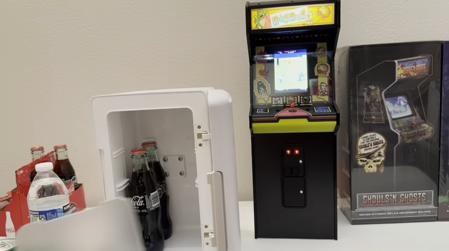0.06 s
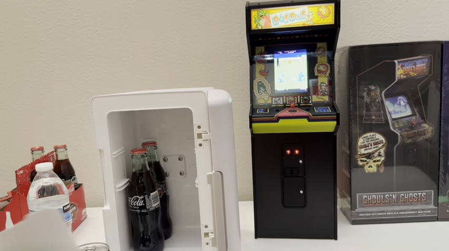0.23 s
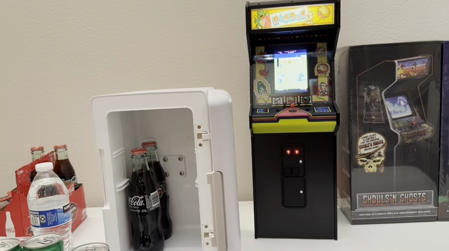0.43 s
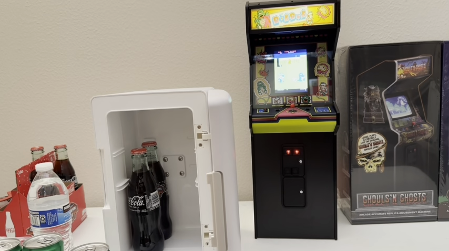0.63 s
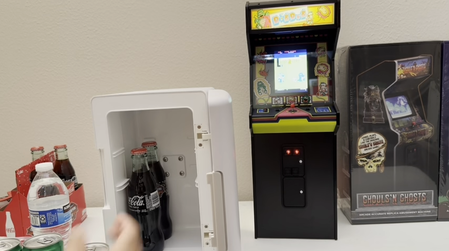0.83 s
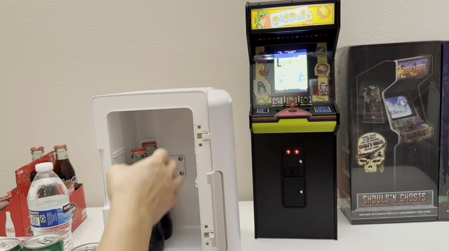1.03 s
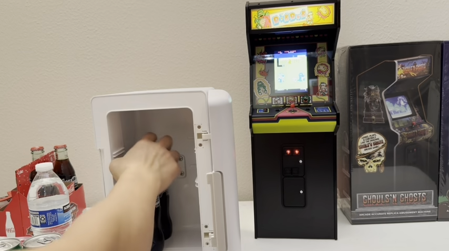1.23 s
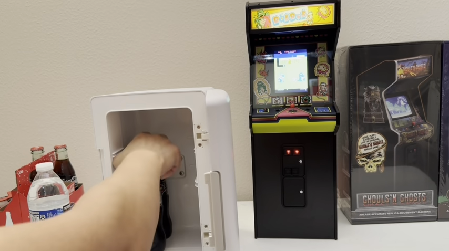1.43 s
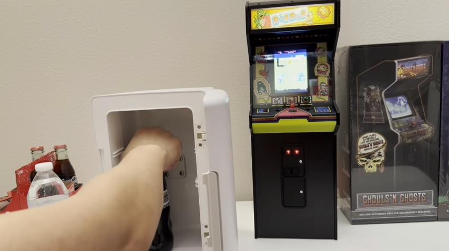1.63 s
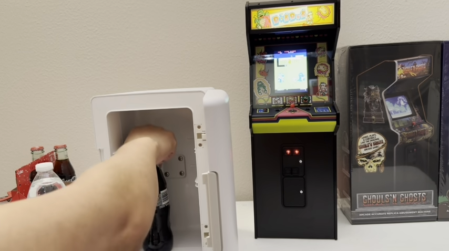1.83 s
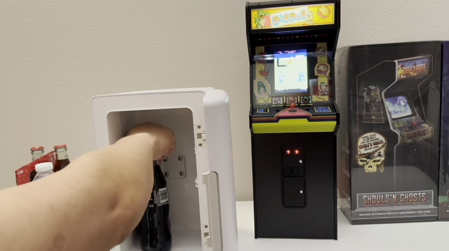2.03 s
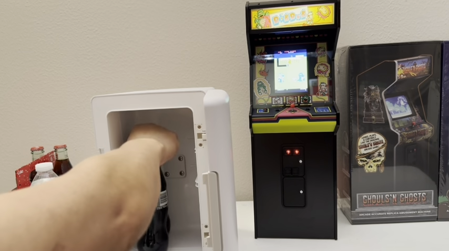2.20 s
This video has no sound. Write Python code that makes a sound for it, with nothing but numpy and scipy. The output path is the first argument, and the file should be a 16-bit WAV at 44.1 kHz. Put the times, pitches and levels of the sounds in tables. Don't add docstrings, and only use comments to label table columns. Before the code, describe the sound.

Small glass bottles knock together brightly inside a mini fridge, their bases thumping on hollow plastic

```python
import sys
import numpy as np
from scipy import signal
from scipy.io import wavfile

SR = 44100
rng = np.random.default_rng(int(sys.argv[2]) if len(sys.argv) > 2 else 0)


def log_audio(samples):
    frames = np.atleast_2d(samples).T
    limited = np.clip(frames, -1, 1)
    pcm = np.round(limited * 32767).astype(np.int16)
    wavfile.write(sys.argv[1], SR, pcm)


def invert_db(x):
    u = np.asarray(x, float) / 20
    return 10 ** u


N = 99798
T = np.arange(N) / SR


def rms_one(x):
    return x / np.sqrt(np.mean(x ** 2) + 1e-20)


def at_hz(points, hz, axis=1):
    points = np.array(points)
    return np.interp(np.log(hz), np.log(points[:, 0]), points[:, axis])


def pan(db):
    return invert_db(np.array([[db / 2], [-db / 2]]))


def band(x, order, hz, kind):
    return signal.sosfilt(signal.butter(order, hz, kind, fs=SR, output="sos"), x)


def drift(rate):
    r = np.exp(-2 * np.pi * rate * 40 / SR)
    slow = signal.lfilter([1], [1, -2 * r, r * r], rng.standard_normal(N // 40 + 2002))[2000:]
    return np.interp(np.arange(N) / 40, np.arange(len(slow)), rms_one(slow))


def fade(x, t60):
    return signal.lfilter([1], [1, -invert_db(-60 / (max(t60, .005) * SR))], x + 1e-18)


def clicks(s, gain):
    out = np.zeros(N, complex)
    out[(np.asarray(s) * SR).astype(int)] = gain
    return out


def strokes(rows):
    out = 0
    for s, hold, db, t60 in rows:
        release_db = 60 * np.maximum(T - s - hold, 0) / t60
        out = out + invert_db(db - release_db) * np.clip((T - s) / 0.008, 0, 1)
    return out


def banded_noise(spectrum, patchy_db, rate):
    # (frequency [Hz], likeness [-1..1], left-right [dB])
    ears = [(50, .995, .5), (250, .97, 2.8), (1000, .65, 4.5), (4000, .4, 4), (12000, .6, 1.5)]
    out, together, corners = 0, drift(rate / 2), 22 * 2 ** np.arange(0, 9.9, .5)
    white = rng.standard_normal((2, 2, N))
    for k, (low, high) in enumerate(zip(corners, corners[1:])):
        hz = np.sqrt(low * high)
        if hz < spectrum[0][0]:
            continue
        mid, side = band(white[k % 2], 2, [low, high], "band")
        alike = np.clip(at_hz(ears, hz), -1, 1)
        stereo = np.sqrt(1 + alike) * mid + np.sqrt(1 - alike) * side * [[1], [-1]]
        gain = invert_db(at_hz(spectrum, hz) + patchy_db * (together + drift(rate)))
        out = out + gain * pan(at_hz(ears, hz, axis=2)) * stereo
    return rms_one(out)


def snap(s, db, t60, low_hz, high_hz=10400.0):
    noise = rng.standard_normal(N) + 1.44 * rng.standard_normal((2, N))
    burst = noise * fade(clicks(s, invert_db(db)).real, t60)
    return pan(4.0) * band(burst, 2, [low_hz, high_hz], "band")


def all_bottles():
    front_hz = [1663, 1782, 1846, 2210, 4200, 4700, 5830, 5997, 7640, 7832, 8592, 13080, 14200]
    side_hz = [1665, 1760, 1846, 2234, 4194, 4727, 5835, 6029, 7596, 8667, 9850, 13070, 15500]
    back_hz = [1782, 1846, 2225, 4180, 4750, 5475, 5870, 7640, 7908, 8600, 11900, 13010, 14480]
    # (level [dB], t60 [s])
    pair_front = [(-11, 0.58), (0, 0.17), (0.5, 0.67), (-9.5, 0.095), (-25.5, 0.18), (-14, 0.095),
                  (-18, 0.072), (-17.5, 0.054), (-15.5, 0.069), (-22.5, 0.067), (-18.5, 0.07), (-33, 0.091),
                  (-35, 0.068)]
    pair_side = [(-14, 0.6), (-15, 1), (2, 0.41), (-13.5, 0.15), (-21.5, 0.2), (-23, 0.2), (-25.5, 0.22),
                 (-20.5, 0.11), (-37.5, 0.53), (-17, 0.079), (-35.5, .2), (-26.5, 0.15), (-29, 0.15)]
    pair_back = [(-9.5, 0.6), (2.5, 0.3), (-18, 0.22), (-25, 0.12), (-15, 0.07), (-30.5, 0.052),
                 (-28.5, 0.03), (-16, 0.07), (-12.5, 0.045), (-18, 0.056), (-22.5, 0.1), (-41, 0.097),
                 (-43, 0.067)]
    # (time [s], level [dB], hardness [dB/octave])
    clinks_front = [
        (1.291, -55.5, -0.5),
        (1.336, -39.5, 8.5),
        (1.367, -45, 11),
        (1.380, -53, 8),
        (1.394, -32.5, -3.5),
        (1.412, -57, 11.5),
        (1.436, -37.5, -2),
        (1.452, -42.5, -23.5),
        (1.476, -50, -11),
    ]
    clinks_side = [
        (1.704, -21, 0.12),
        (1.775, -56, 2),
        (1.859, -51.5, 0.78),
    ]
    clinks_back = [
        (1.892, -28, 0.18),
        (1.906, -38, 4.7),
        (1.930, -41.5, 6.8),
        (1.996, -39.5, 1.2),
        (2.012, -85, 1.3),
    ]
    front = bottles(front_hz, pair_front, clinks_front)
    side = bottles(side_hz, pair_side, clinks_side)
    return front + side + bottles(back_hz, pair_back, clinks_back)


def bottles(pitches, modes, hits):
    # (time [s], pitch change [%])
    tilting = [
        (1.79, 0),
        (1.845, 1.6),
        (1.875, 1.5),
        (1.89, 0),
        (1.92, .1),
        (1.975, 1.55),
        (2.04, 1.7),
        (2.13, .2),
    ]
    # (frequency [Hz], left-right [dB])
    glass_pan = [(1850, -1), (2200, 3.5), (5000, 5.5), (8000, 9.5), (13000, -2.5)]
    tilt_top_hz, tilt_fade = 1780, 0.89
    twin_spread, twin_db, twin_life = 0.0117, -7.5, 0.48
    chatter_per_s, chatter_db, chatter_t60_s = 620, -4, 0.21
    glass_db, spread_db = -1, 5
    grip_s, grip_t60_s = 2.138, .09
    first = int(1.28 * SR)

    s, db, hard = np.transpose(hits)
    modes = [(hz, *mode) for hz, mode in zip(pitches, modes)]
    twins = []
    for hz, level_db, t60 in modes[4:]:
        for way in (-1, 1, 2.5 * rng.choice([-1, 1])):
            twin_hz = hz * (1 + twin_spread * way * rng.uniform(0.25, 1))
            twins.append((twin_hz, level_db + twin_db, t60 * twin_life))
    luck = rng.standard_normal((len(s), 4 * len(modes)))
    chatter = fade(clicks(s, invert_db(db + 1.49 * hard + chatter_db)).real, chatter_t60_s)
    rebounds = (rng.random(N) < chatter_per_s / SR) * rng.standard_normal(N) * chatter
    tilt = np.interp(T, *np.transpose(tilting))[first:] / 100
    out = np.zeros((2, N))
    for k, (hz, level_db, t60) in enumerate(modes + twins):
        bend = (k > 0) * tilt * min(1, (tilt_top_hz / hz) ** tilt_fade)
        turn = np.exp(2j * np.pi * np.cumsum(hz * (1 + bend)) / SR)
        upper = k > 2
        struck = clicks(s, invert_db(db + hard * np.log2(hz / 1846) + upper * spread_db * luck[:, k]))
        struck = struck + upper * rebounds
        ringing = fade(invert_db(level_db) * struck[first:] / turn ** upper, t60)
        ringing = fade(ringing, 0.0095) * turn * np.log(1000) / (0.0089 * SR)
        ear_phase = rng.normal(0, 0.3 * np.sqrt(hz / 1846) * (1 + upper), (2, 1))
        out[:, first:] += pan(at_hz(glass_pan, hz)) * np.imag(ringing * np.exp(1j * ear_phase))
    out = out * invert_db(glass_db - 60 * np.maximum(T - grip_s, 0) / grip_t60_s)
    crack = snap(s, db + 2 * hard - 30, 0.015, low_hz=1200.)
    return out + crack + shimmer(s, db + 2.83 * hard - 30.5, pitches)


def shimmer(s, db, pitches):
    # (frequency [Hz], level [dB])
    clusters = [(7200, 5.5), (8200, -1), (9300, 2), (10100, -3), (13800, 4), (15500, 2)]
    width_hz, gap_db = 450, -16
    burst = snap(s, db, 0.21, low_hz=5040.0, high_hz=15900.0)
    r = np.exp(-np.pi * width_hz / SR)
    peak = (1 - r * r) ** 2 / 4
    bands = 0
    for hz, level_db in [(hz, 0) for hz in pitches[4:]] + clusters:
        a = [1, -2 * r * np.cos(2 * np.pi * hz / SR), r * r]
        bands = bands + invert_db(level_db) * signal.lfilter([peak, 0, -2 * peak, 0, peak], np.convolve(a, a), burst)
    return bands + invert_db(gap_db) * burst


def knocks():
    # (time [s], level [dB], hardness [dB/octave])
    thumps = [(.003, -45, 1), (1.202, -70, 12), (1.265, -64.5, 8), (1.290, -48, 3.2), (1.335, -25.5, -1),
              (1.368, -24.5, -1), (1.381, -41.5, 10.5), (1.399, -34, -5), (1.444, -26, -9),
              (1.475, -29.5, -0.5), (1.491, -36.5, 5), (1.513, -28, -7.5), (1.544, -47.5, 0),
              (1.606, -62.5, 10.5), (1.631, -30, 2.15), (1.704, -46, 10.5), (1.836, -39, 3),
              (1.72, -52.5, 12), (1.91, -38, 4), (1.96, -40, -1.5), (2.005, -46.5, 2), (2.136, -31, 3.5),
              (2.141, -23.5, -5), (2.152, -23, -6.5), (2.165, -38.5, 8.5), (2.170, -37, 1.5),
              (2.176, -28.5, 6), (2.180, -27, 4), (2.183, -25.5, 5), (2.187, -25.5, 1), (2.191, -33, 1.5),
              (2.199, -26, -10.5), (2.208, -19, -5), (2.214, -25, -4), (2.221, -31, -16), (2.235, -40, -3)]
    # (frequency [Hz], level [dB], t60 [s])
    body = [(110.8, -17.5, 0.28), (206.5, -17, 0.21), (281.6, -2.5, 0.076), (389, 1, 0.047),
            (560, -7, 0.045), (622.8, -8.5, 0.15), (767, -11, 0.12), (928, -9, 0.043), (1101, -12, 0.094),
            (1491, -7, 0.03), (1983, -16.5, 0.075), (2614, -16.5, 0.018)]
    s, db, hard = np.transpose(thumps)
    luck, out = rng.standard_normal((len(s), 2 * len(body))), 0
    for k, (hz, level_db, t60) in enumerate(body):
        turn = np.exp(2j * np.pi * hz * T)
        sign = np.where(hz < 700, 1, np.sign(luck[:, -k - 1]))
        struck = clicks(s, invert_db(db + level_db - 8 + hard * np.log2(hz / 300) + 2.5 * luck[:, k]) * sign)
        ear_phase = rng.normal(0, hz / 1800, (2, 1))
        out = out + np.imag(fade(struck / turn, t60) * turn * np.exp(1j * ear_phase))
    thump = pan(4.5) * band(out, 3, 85., "high")
    return thump + snap(s, db + 2 * hard - 22.5, 0.027, low_hz=700.)


def drags():
    # (start [s], length [s], level [dB], release t60 [s])
    scrapes = [
        (1.34, 0.062, -45.5, 0.069),
        (1.37, 0.15, -43.5, 0.22),
        (1.64, 0.072, -48, 0.83),
        (1.84, 0.089, -52, 0.75),
        (2.138, 0.015, -52, 0.11),
        (2.166, 0.029, -40.5, 0.35),
    ]
    # (frequency [Hz], level [dB/Hz])
    scrape_spectrum = [(60, -44), (300, 2.5), (800, -11.5), (1500, -17), (2500, -18), (5000, -37),
                       (10000, -37.5), (16000, -65)]
    return strokes(scrapes) * banded_noise(scrape_spectrum, patchy_db=4.0, rate=37.0)


def brushes():
    # (start [s], length [s], level [dB], release t60 [s])
    rubs = [
        (0.0, 0.03, -74, 0.9),
        (.485, 0.024, -68.5, 0.16),
        (.575, 0.005, -69, 0.087),
        (.83, .08, -73, 0.14),
        (1.26, 0.13, -72.5, 0.13),
        (2.06, 0.08, -71, 0.55),
    ]
    # (frequency [Hz], level [dB/Hz])
    rub_spectrum = [(1000, -31), (3000, -12.5), (8500, -16.5), (11000, -26), (13500, -29.5), (16000, -5)]
    return strokes(rubs) * banded_noise(rub_spectrum, patchy_db=1.0, rate=30.0)


def echoes(x):
    room_t60_s, wall_cut_hz = 0.4, 11200
    out, dull = np.zeros((2, N)), np.exp(-2 * np.pi * wall_cut_hz / SR)
    for k, lag in enumerate((rng.uniform(0.0087, .035, 16) * SR).astype(int)):
        loop, gain, state = x.copy(), invert_db(-60 * lag / SR / room_t60_s), [0.]
        for i in range(lag, N, lag):
            back, state = signal.lfilter([gain * (1 - dull)], [1, -dull], loop[i - lag:i], zi=state)
            loop[i:i + lag] += back[:N - i]
        out[k % 2] += (loop - x) * (-1) ** (k // 2)
    return out


def fan():
    # (frequency [Hz], level [dB], width [Hz])
    hums = [(257, -66.5, 2), (385.6, -71.5, 21), (1518, -81.5, 2.3), (1895, -86, 21)]
    out = 0
    for hz, db, width in hums:
        noise = rng.standard_normal(N) + 1j * rng.standard_normal(N)
        wobble = signal.lfilter([1], [1, -np.exp(-np.pi * width / SR)], noise)
        tone = np.real((4.6 + wobble / np.std(wobble)) * np.exp(2j * np.pi * hz * T))
        out = out + invert_db(db) * rms_one(tone)
    return pan(1.3) * out


def room():
    # (frequency [Hz], level [dB/Hz])
    air_spectrum = [(25, -18), (55, 0), (110, -8), (240, -20), (500, -28), (1600, -36), (3000, -48),
                    (16000, -64)]
    # (time [s], level [dB])
    shaking = [(0, -54.5), (.3, -56), (.5, -60), (.72, -52), (1.0, -58.5), (1.33, -59.5), (1.4, -46.5),
               (1.54, -40.5), (1.63, -59.5), (1.85, -50.5), (2.12, -59.5), (2.2, -45), (2.26, -58)]
    air = banded_noise(air_spectrum, patchy_db=.8, rate=9.)
    low, high = [band(air, 3, 151, kind) for kind in ("low", "high")]
    return invert_db(np.interp(T, *np.transpose(shaking))) * rms_one(low) + invert_db(-52.5) * high


def scene():
    near = all_bottles() + knocks() + drags()
    to_walls = band(near.mean(axis=0), 1, 500., "high")
    return near + invert_db(-16.5) * echoes(to_walls) + room() + brushes() + fan()


def low_pass(x):
    return signal.sosfilt(signal.butter(12, 16460, fs=SR, output="sos"), x)


def record(dry):
    dry = signal.sosfilt(signal.cheby2(10, 60, 16900, fs=SR, output="sos"), dry)
    notched = band(1.032 * dry, 3, [10300., 12600.], "bandstop")
    heard = band(notched, 2, 30., "high") + 0.13 * dry
    lows = signal.sosfiltfilt(signal.butter(2, 3000., fs=SR, output="sos"), heard[1])
    heard[1] += np.roll(lows, 2) - lows
    return low_pass(heard)


dry = scene()
out = record(dry)
log_audio(out)
```